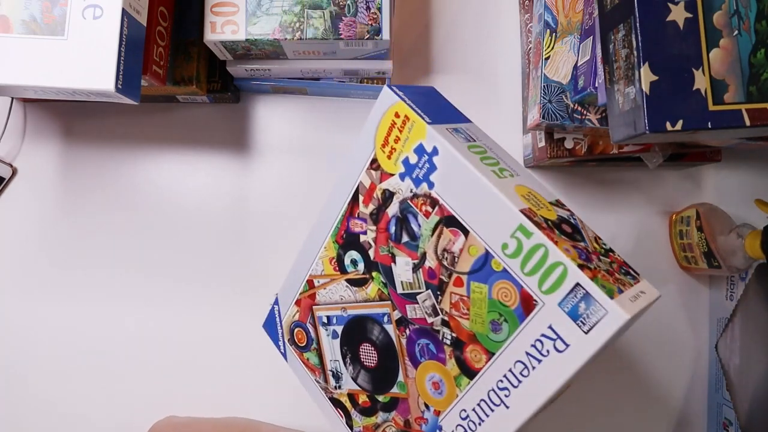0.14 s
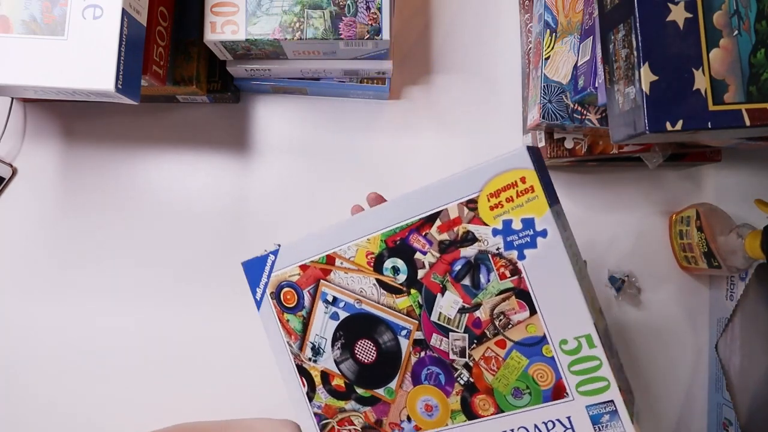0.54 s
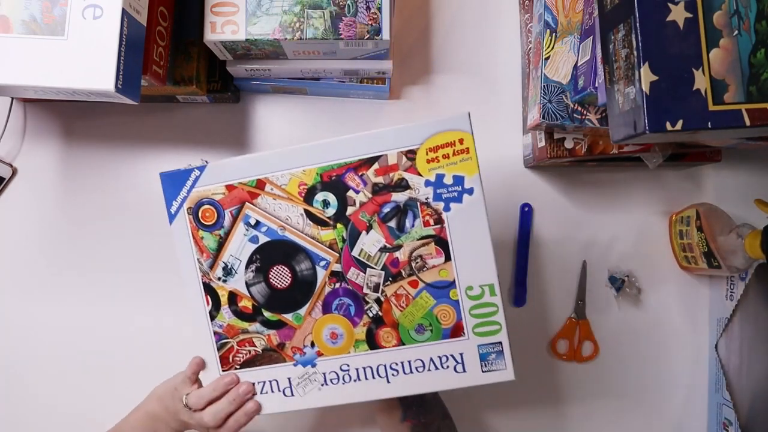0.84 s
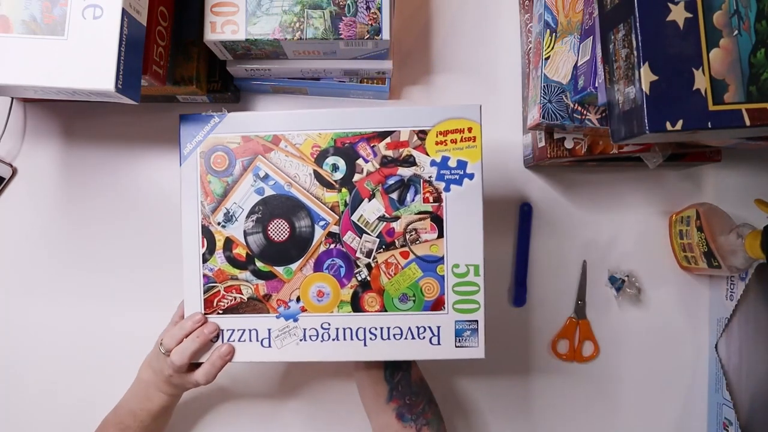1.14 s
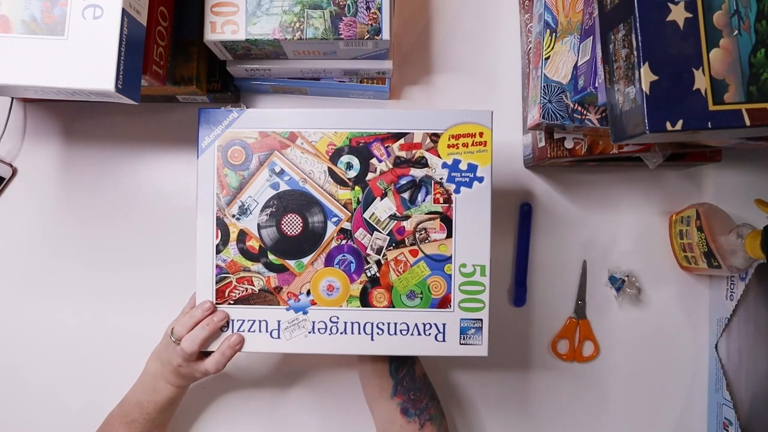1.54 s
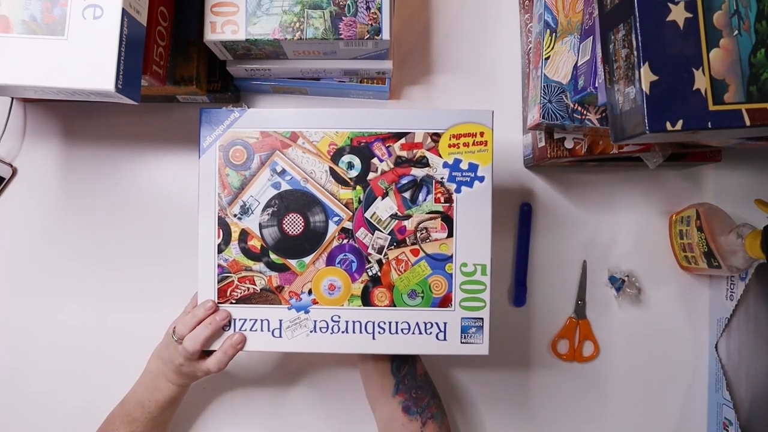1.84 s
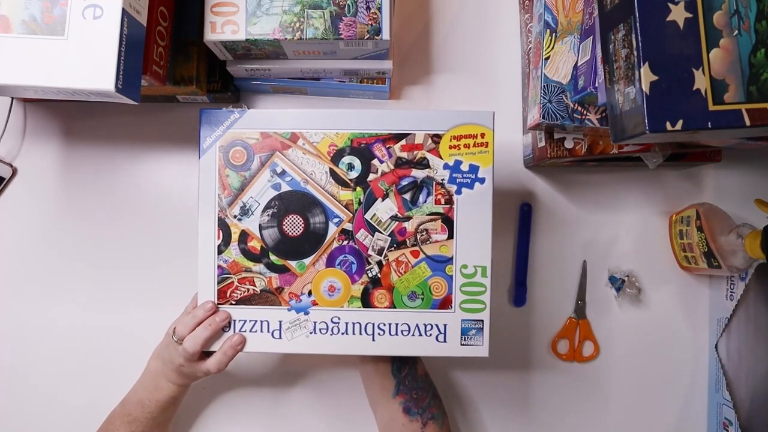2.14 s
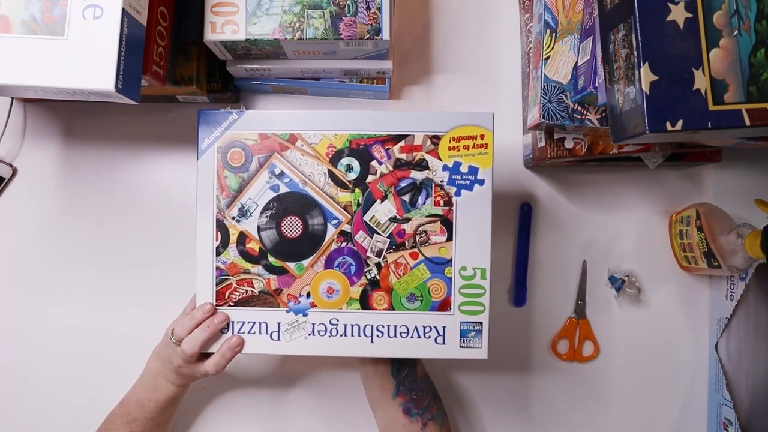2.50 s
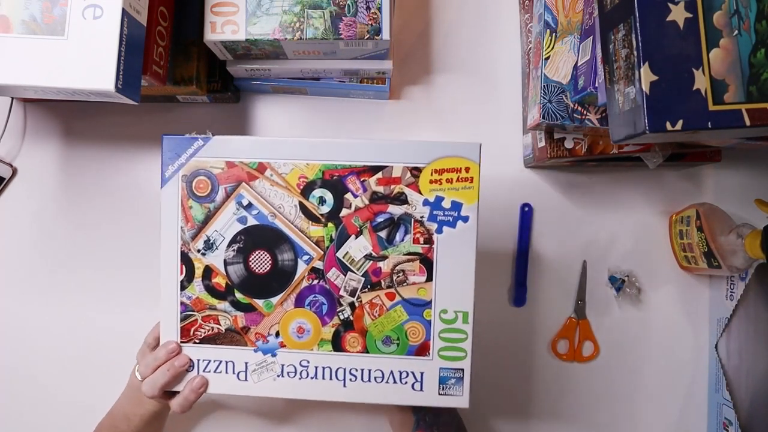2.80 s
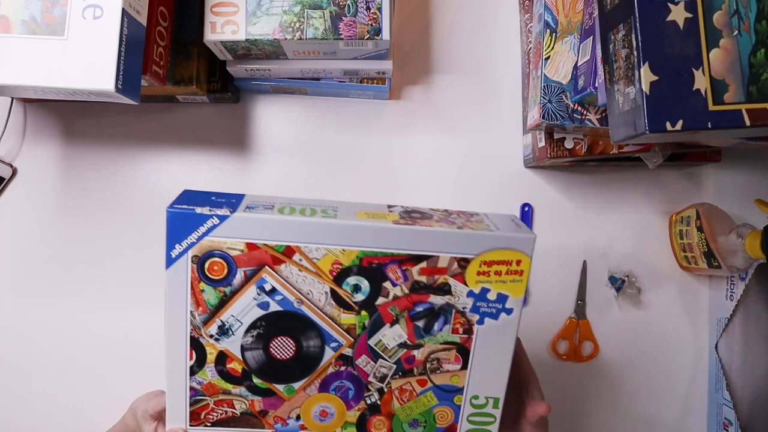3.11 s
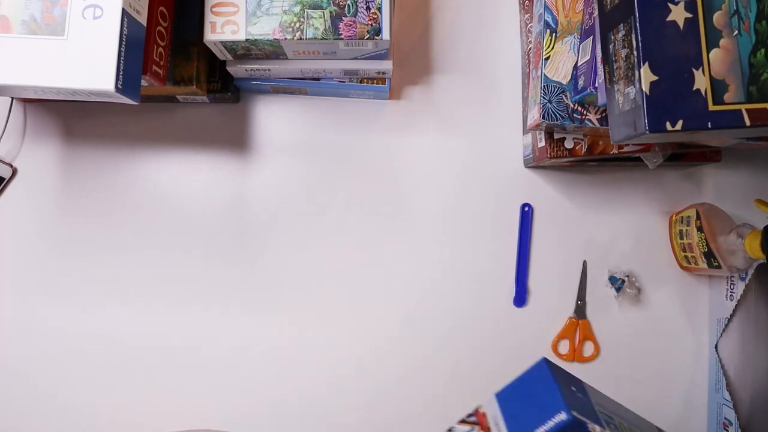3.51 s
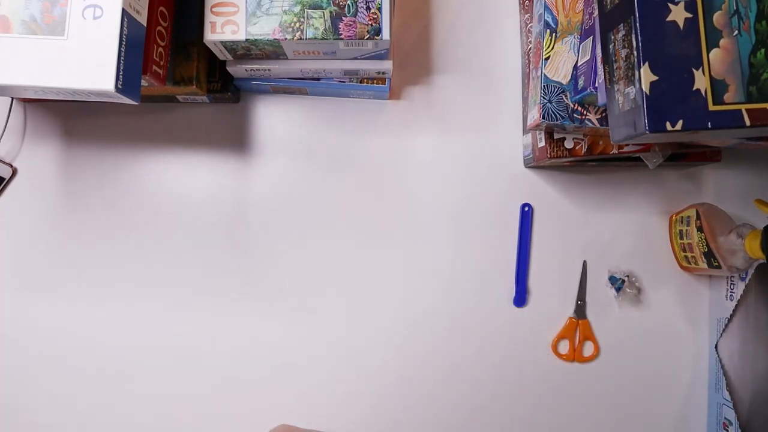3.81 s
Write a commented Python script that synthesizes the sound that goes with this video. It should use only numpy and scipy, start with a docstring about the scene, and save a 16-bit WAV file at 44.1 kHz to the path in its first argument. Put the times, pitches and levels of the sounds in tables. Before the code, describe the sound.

A cardboard box of puzzle pieces is turned by hand: hollow knocks and rattling, a still hold, soft finger rubbing, then a hard final tumble, heard close up in a small room with faint hum.

```python
"""Loose pieces knock and tumble in a cardboard puzzle box, tilted and turned over a table in a quiet room.
Each knock is a noise blow ringing the box modes, the air inside and one panel, with a crack on top;
the tumble is a random rain of small blows on the same modes, with ticks of noise.
Fingers slide over the glossy lid as shaped noise, and the room answers with a dense, gently shifting tail.
A faint appliance hum, two fuzzy tones, lies under the room noise."""
import sys
import numpy as np
from scipy import signal
from scipy.fft import rfft, irfft
from scipy.io import wavfile
from scipy.ndimage import uniform_filter1d

SR = 44100
rng = np.random.default_rng(int(sys.argv[2]) if len(sys.argv) > 2 else 0)


def transcribe(signal):
    """Save signal, clipped to [-1, 1], as a 16-bit WAV file at the path in sys.argv[1]."""
    frames = np.atleast_2d(signal).T
    limited = np.clip(frames, -1, 1)
    pcm = np.round(limited * 32767).astype(np.int16)
    wavfile.write(sys.argv[1], SR, pcm)


N = 174195

# Ringing modes of the box. Each row: frequency in Hz, width in Hz, relative level in dB.
BOX_MODES = [(174, 58, -3), (220.3, 41, 4), (317, 24, -4), (415.6, 70, 6), (550, 43, -2.5), (625, 63, 5.5),
             (716, 140, 6.5), (802, 33, -3.5), (930, 55, -7), (1220, 150, -8), (1520, 130, -15),
             (2160, 300, -39), (2600, 280, -31), (3200, 360, -15)]
# Spectrum of cracking card. Each row: frequency in Hz, relative spectrum level in dB.
CRACK_COLOUR = [(590, -16), (1000, 3.5), (1740, 3), (2560, -5.5), (3050, -6.5), (6280, -20), (10800, -33.5),
                (15600, -72)]
# Stereo image of box and fingers. Each row: frequency in Hz, left-right likeness from -1 to 1.
BOX_LIKENESS = [(60, 0.96), (120, 1), (240, 0.95), (480, 0.99), (950, 0.58), (1890, -0.051), (3770, -0.16),
                (7520, -0.51), (15000, -0.41)]

SOFT_HZ = 2840  # card on card is soft: the blow has little treble
LOW_CUT_HZ, EDGE_HZ = 110, 15600  # low cut of the box, top edge of the whole sound

# Tumbling pieces
PIECES_PER_S, PIECE_SPREAD_DB = 900, 4
CLUMP_DB, CLUMP_S = 2.5, .012  # pieces slip in small avalanches
DRIFT_DB, DRIFT_S = 4, .06  # pieces wander over the card, so each mode swells and fades
PIECE_TICK_S, PIECE_TICK_DB = .0025, -7.5  # tick decay, level beside the body at middle brightness
BRIGHT_DB = 12.5  # tilt per octave for a full step of brightness

# Knocks
SNAP, SNAP_S = .7, .0002  # first touch, against the noisy contact after it
SPLIT_HZ = 500  # air modes below, upper box modes above
SPOT_DB = 3  # spread of mode levels with the spot struck
AIR_DB, BODY_DB = -5, -13.5  # air beside the thump, upper modes below the knock level
THUMP_WIDTH_HZ, PANEL_WIDTH_HZ = 110, 170
OVERTONE, OVERTONE_DB = 1.696, -9.5  # second mode of the struck panel
CRACK_S = .012

# Room
FADE_HALF_CYCLES_PER_S = 1.7  # how quickly the three reverberation tails take turns
ECHO_DB, ECHO_WAIT_S = -4.5, .003


def amp(db):
    """Decibels to linear gain."""
    return 10 ** (np.asarray(db) / 20)


def evened(x):
    """Scales to an rms of one."""
    return x / np.sqrt(np.mean(x ** 2) + 1e-20)


def read(points, hz):
    """Reads a frequency table between its points, on a log frequency axis."""
    f, value = np.transpose(points)
    return np.interp(np.log(hz + 1), np.log(f + 1), value)


def curve(table, column):
    """Draws one column of a time table as a line over the whole scene."""
    rows = np.transpose(table)
    return np.interp(np.arange(N) / SR, rows[0], rows[column])


def smoothed(x, seconds):
    """Two moving averages along time."""
    size = int(seconds * SR)
    return uniform_filter1d(uniform_filter1d(x, size), size)


def coloured(x, points):
    """Filters by a spectrum in dB."""
    size = x.shape[-1]
    return irfft(rfft(x) * amp(read(points, np.fft.rfftfreq(size, 1 / SR))), size)


def ring(x, hz, width):
    """One damped mode struck by x; a wider mode dies sooner."""
    r = np.exp(-np.pi * abs(width) / SR)
    return signal.lfilter([.5, 0, -.5], [1, -2 * r * np.cos(2 * np.pi * hz / SR), r * r], x)


def double_ring(x, hz, width):
    """A mode with a rounded onset: a broad resonance feeds a narrow one."""
    return ring(ring(x, hz, 3 * width), hz, width)


def soften(x):
    """Soft card dulls the treble of a blow."""
    return signal.sosfilt(signal.butter(2, SOFT_HZ, fs=SR, output="sos"), x)


def two_ports(a, b):
    """Left is a; right blends a with b, alike in the bass and partly opposite in the treble."""
    size = len(a)
    same = np.clip(read(BOX_LIKENESS, np.fft.rfftfreq(size, 1 / SR)), -1, 1)
    right = same * rfft(a) + np.sqrt(1 - same ** 2) * rfft(b)
    return np.array([a, irfft(right, size)])


def pair_noise(colour, likeness, patchy_db):
    """Stereo noise, partly alike left and right, with drifting patches in time and frequency."""
    frames, hz = N // 128 + 5, np.fft.rfftfreq(1024, 1 / SR)
    a, b, c, d, patch = rng.standard_normal((frames // 2, 513, 5)).T
    patch = uniform_filter1d(patch, size=12, axis=0)
    patch = evened(uniform_filter1d(patch, size=10, axis=1))
    same = np.clip(read(likeness, hz), -1, 1)[:, None]
    left = a + 1j * b
    right = same * left + np.sqrt(1 - same ** 2) * (c + 1j * d)
    z = np.array([left, right]) * amp(read(colour, hz)[:, None] + patchy_db * patch)
    return evened(signal.istft(z, nperseg=1024, noverlap=768)[1][:, :N])


def background():
    """Room noise and two appliance hum tones, each a sine made fuzzy by narrow noise around it."""
    # Room noise spectrum. Each row: frequency in Hz, relative spectrum level in dB.
    noise_colour = [(20, -30), (40, -16), (70, -1), (120, 2.5), (200, 0), (330, -3), (600, -3.5),
                    (1000, -11), (2000, -14), (4000, -21), (8000, -29), (13000, -92), (15600, -70)]
    # Room noise image. Each row: frequency in Hz, left-right likeness from -1 to 1.
    noise_likeness = [(60, 1), (130, 0.82), (290, 0.13), (640, -0.03), (1410, -0.79), (3100, -0.77),
                      (6820, -0.61), (15000, -0.55)]
    # Hum tones. Each row: frequency in Hz, width of the fuzz in Hz, level in dB.
    hum_tones = [(90, 3.8, -52.5), (238.5, 9.3, -54.5)]
    hum = 0
    for hz, width, db in hum_tones:
        tone = np.sin(2 * np.pi * hz * np.arange(N) / SR)
        fuzz = evened(ring(rng.standard_normal(N), hz, width))
        hum = hum + amp(db) * evened(tone + 0.34 * fuzz)
    return amp(-44.5) * pair_noise(noise_colour, noise_likeness, patchy_db=0.5) + hum


def echoes(x, decay, wait_s):
    """Dense reflections, each band dying at its own speed, partly alike left and right."""
    hz, t, z = signal.stft(rng.standard_normal((2, SR // 2)), SR, nperseg=128)
    tail = signal.istft(z * amp(-60 * t / read(decay, hz)[:, None]), SR, nperseg=128)[1]
    tail = two_ports(*np.pad(tail, ((0, 0), (int(wait_s * SR), 0))))
    return signal.fftconvolve(x[None], tail / np.linalg.norm(tail[0]), axes=1)[:, :N]


def shifting_room(x):
    """Three sets of reflections fade in and out in turn, at steady total power."""
    # Room decay. Each row: frequency in Hz, time to fall 60 dB in seconds.
    decay = [(200, 0.55), (600, 0.41), (1500, 0.31), (4000, 0.43), (10000, 0.13)]
    phase = np.pi * FADE_HALF_CYCLES_PER_S * np.arange(N) / SR
    room = 0
    for k in range(3):
        fade = np.sqrt(2 / 3) * np.cos(phase + k * np.pi / 3)
        room = room + echoes(x * fade, decay, ECHO_WAIT_S)
    return amp(ECHO_DB) * room


def slide():
    """Skin dragging on glossy card: a fine, slightly patchy hiss."""
    # Loudness of the sliding as a line. Each row: time in seconds, level in dB.
    slide_level = [(0, -71), (.05, -39.5), (.2, -54), (.33, -53), (.5, -47.5), (.62, -41.5), (.95, -45.5),
                   (1.02, -49.5), (1.2, -61.5), (1.9, -62), (2.62, -63.5), (2.72, -51), (2.92, -47),
                   (2.98, -39), (3.14, -37.5), (3.22, -46.5), (3.3, -49.5), (3.4, -51), (3.55, -41),
                   (3.8, -43.5), (3.95, -41)]
    # Hiss spectrum. Each row: frequency in Hz, relative spectrum level in dB.
    slide_colour = [(500, -41), (1200, -7.5), (2500, -9.5), (5000, -10), (8000, -12), (11300, -10.5),
                    (13500, -21), (15600, -41)]
    return amp(curve(slide_level, 1)) * pair_noise(slide_colour, BOX_LIKENESS, patchy_db=0.9)


def tumble():
    """Many small pieces land at random; each side hears a piece through other modes of the box."""
    # Flow of the pieces. Each row: time in seconds, level in dB, brightness from 0 to 1.
    flow = [(0.0, -34, 0.59), (0.22, -45, 0.65), (0.44, -42, 0.46), (0.58, -39.5, 0.52), (0.64, -37.5, 0.4),
            (0.68, -35, 0.78), (0.73, -36, 0.58), (0.78, -29.5, 0.54), (0.84, -32.5, 0.68),
            (0.875, -38, 0.44), (0.9, -29.5, 0.65), (0.96, -38, 0.66), (1.1, -40.5, 0.59),
            (1.22, -41, 0.54), (1.4, -48.5, 0.3), (1.53, -40, 0.24), (1.64, -49, 0.5), (1.88, -53, 0.64),
            (2.14, -61.5, 0.68), (2.69, -56, 0.68), (2.91, -50.5, 0.6), (3.12, -45.5, 0.07),
            (3.28, -39, 0.34), (3.37, -34.5, 0.41), (3.435, -27, 0.59), (3.49, -25, 0.66),
            (3.55, -21.5, 0.68), (3.62, -23, 0.79), (3.66, -22, 0.75), (3.73, -19, 0.61),
            (3.79, -28.5, 0.68), (3.85, -25.5, 0.8), (3.9, -42, 0.68), (3.95, -39.5, 0.76)]
    bright = curve(flow, 2) - .5
    landing = rng.random(N) < PIECES_PER_S / SR
    hits = landing * amp(PIECE_SPREAD_DB * np.minimum(rng.exponential(1, N), 3))
    clump = evened(smoothed(rng.standard_normal(N), CLUMP_S))
    hits = hits * rng.choice([-1., 1.], N) * amp(CLUMP_DB * clump)

    spots = rng.random((N, 2, len(BOX_MODES))).T < .3  # a piece reaches about a third of the modes
    drifts = smoothed(rng.standard_normal((N, len(BOX_MODES))).T, DRIFT_S)
    body = 0
    for (hz, width, db), spot, drift in zip(BOX_MODES, spots, drifts):
        tilt = BRIGHT_DB * bright * np.log2(hz / 600)
        body = body + amp(db + DRIFT_DB * evened(drift) + tilt) * ring(hits * spot, hz, width)
    body = evened(soften(body))

    tick_decay = np.exp(-np.arange(600) / SR / PIECE_TICK_S)
    tick = coloured(rng.standard_normal((2, N)), CRACK_COLOUR)
    tick = evened(tick * signal.oaconvolve(abs(hits), tick_decay)[:N])
    tick = amp(PIECE_TICK_DB + 2.7 * BRIGHT_DB * bright) * tick
    return two_ports(*(amp(curve(flow, 1)) * (body + tick)))


def knock(row, t):
    """A noisy blow rings the box modes by where it lands, the air inside and the nearest panel."""
    _, db, thump_db, thump_hz, crack_db, panel_db, panel_hz, contact_s, pan_db = row
    blow, crack = rng.standard_normal((2, 2, len(t)))
    spot = rng.standard_normal(len(BOX_MODES))
    contact = np.minimum(t / (0.096 * contact_s), 1) * np.exp(-t / contact_s)
    blow = blow * contact + SNAP * np.exp(-t / SNAP_S)

    soft_blow = soften(blow)
    air, body = 0, 0
    for (hz, width, mode_db), k in zip(BOX_MODES, spot):
        mode = amp(mode_db + SPOT_DB * k) * ring(soft_blow, hz, width)
        if hz < SPLIT_HZ:
            air = air + mode
        else:
            body = body + mode
    thump = double_ring(blow, thump_hz, THUMP_WIDTH_HZ)
    panel = double_ring(blow, panel_hz, PANEL_WIDTH_HZ)
    overtone = double_ring(blow, OVERTONE * panel_hz, OVERTONE * PANEL_WIDTH_HZ)
    panel = panel + amp(OVERTONE_DB) * overtone
    crack = coloured(crack, CRACK_COLOUR) * contact * np.exp(-t / CRACK_S)
    crack = np.diff(crack, prepend=0)  # tilts the crack toward the treble

    # Even each part over its first 600 samples, so the levels set the balance of the attack
    thump, air, body, panel, crack = (part / np.sqrt(np.mean(part[:, :600] ** 2, 1, keepdims=True))
                                      for part in (thump, air, body, panel, crack))
    sound = amp(thump_db) * (thump + amp(AIR_DB) * air) + amp(db + BODY_DB) * body
    sound = sound + amp(panel_db) * panel + amp(crack_db) * crack
    # Silence ahead takes the backward spread of the stereo filter, then is cut away
    stereo = two_ports(*np.pad(sound, ((0, 0), (512, 0))))[:, 512:]
    return stereo * amp([[pan_db / 2], [-pan_db / 2]])


def knocks():
    """Single blows on the hollow box, each ringing out over those before it."""
    # Knocks on the box. Each row: start in seconds, knock level in dB (upper modes sit BODY_DB from it),
    # thump level in dB, thump frequency in Hz, crack level in dB, struck panel level in dB,
    # panel frequency in Hz, contact decay in seconds, left over right in dB.
    knock_rows = [(0.005, -17.5, -48, 235, -32.5, -31, 1330, 0.0049, 0),
                  (0.047, -21, -61, 360, -28.5, -36, 1130, 0.01, -8.5),
                  (0.124, -20.5, -45.5, 168, -41, -36, 1500, 0.006, 2.5),
                  (0.292, -19.5, -54, 393, -35, -31, 2510, 0.0059, -5.5),
                  (0.301, -52, -68, 390, -62, -46, 2550, 0.035, -11),
                  (0.488, -32, -50, 255, -72, -43, 1610, 0.0055, 4),
                  (0.558, -21.5, -41, 179, -37, -35.5, 1790, 0.0058, 3),
                  (0.649, -11.5, -35, 224, -35, -51, 1350, 0.0065, 1.5),
                  (0.666, -13, -29.5, 219, -34.5, -40, 1704, 0.0026, -1),
                  (0.690, -29, -34.5, 410, -48, -38, 690, 0.004, -2),
                  (0.742, -14.5, -34, 406, -55, -33, 820, 0.0057, 1.5),
                  (0.764, -14, -31, 210, -34, -37, 2620, 0.0083, 0),
                  (0.801, -21, -30.5, 404, -48, -27, 1037, 0.0026, -0.5),
                  (0.813, -18.5, -29.5, 201, -43, -33, 2100, 0.0035, -1),
                  (0.881, -15.5, -37, 420, -36.5, -40, 2900, 0.0069, -1.5),
                  (0.912, -27, -43, 304, -42, -32, 2260, 0.0069, -6),
                  (0.917, -9.5, -25.5, 198, -33, -25.5, 1010, 0.0041, 0),
                  (1.167, -16.5, -37, 310, -37.5, -36.5, 2460, 0.0062, -1.5),
                  (1.176, -22, -48, 310, -39, -44, 2500, 0.0033, 2),
                  (1.241, -21, -36, 387, -63, -39, 1470, 0.001, 0.5),
                  (1.248, -27, -34, 390, -62, -39, 1290, 0.0046, -3.5),
                  (1.286, -41, -49, 396, -64, -40.5, 1430, 0.002, -2),
                  (1.415, -37, -40.5, 430, -80, -39, 770, 0.0067, 7),
                  (1.429, -8.5, -39, 417, -34.5, -31, 1010, 0.0037, -3),
                  (1.455, -19, -33.5, 435, -54, -62, 1750, 0.0042, 2),
                  (1.493, -14, -32, 416, -40, -46, 1320, 0.015, -1),
                  (1.521, -26.5, -33, 426, -56, -42, 1560, 0.01, 1),
                  (1.571, -41, -36.5, 406, -53, -62, 1650, 0.0053, -4.5),
                  (1.665, -18, -26, 364, -55, -27.5, 1570, 0.009, 0),
                  (1.694, -14.5, -34.5, 445, -79, -37, 1740, 0.0078, -4),
                  (1.741, -38, -39.5, 316, -75, -36, 1540, 0.01, 3),
                  (1.751, -15, -26.5, 440, -35.5, -29.5, 1540, 0.0076, -1),
                  (1.984, -43, -54.5, 318, -72, -48.5, 1640, 0.0032, 10),
                  (2.106, -50, -56, 250, -56.5, -81, 1590, 0.003, 15.5),
                  (2.671, -41, -58, 224, -62, -75, 1750, 0.0047, -16),
                  (2.702, -40, -51, 238, -47.5, -55, 2450, 0.012, -6),
                  (2.747, -49, -43, 268, -50, -53, 1490, 0.025, 0),
                  (2.801, -60, -41, 203, -46, -63, 1400, 0.011, 1.5),
                  (2.83, -34.5, -40.5, 420, -45, -55, 1320, 0.0039, -0.5),
                  (3.209, -22, -45, 197, -34, -38, 790, 0.0053, -3),
                  (3.313, -23.5, -40, 228, -37.5, -57, 1660, 0.018, -2),
                  (3.35, -42, -64, 300, -49, -48, 606, 0.0091, -2),
                  (3.383, -25, -53, 302, -42, -41, 906, 0.0038, 0),
                  (3.445, -17, -32, 447, -42, -32.5, 1540, 0.0057, -2),
                  (3.468, -22, -39, 445, -35, -36, 1600, 0.0025, -4),
                  (3.484, -16, -29, 400, -38, -28.5, 3130, 0.0057, -1.5),
                  (3.5, -21, -18.5, 417, -20, -22.5, 1480, 0.0055, 1),
                  (3.529, -34, -17, 322, -18.5, -21, 2970, 0.011, 1),
                  (3.554, -15, -26.5, 427, -30, -23, 1510, 0.0041, -1.5),
                  (3.605, -41, -27, 423, -23, -38, 1550, 0.013, -0.5),
                  (3.634, -10, -42, 406, -32, -21.5, 1640, 0.0036, 1),
                  (3.647, -11, -33, 500, -29, -23, 1480, 0.0027, 1),
                  (3.661, -14, -31, 560, -42, -26, 2210, 0.0034, -3),
                  (3.699, -8, -28, 344, -50, -27.5, 1290, 0.0061, 4),
                  (3.717, -7.5, -31, 445, -32.5, -22.5, 1150, 0.003, 1),
                  (3.744, -11, -30, 443, -42, -35, 1290, 0.0026, 1),
                  (3.767, -8, -22, 396, -57, -27, 1290, 0.0031, 0.5),
                  (3.808, -7, -26.5, 383, -40, -38, 1000, 0.0036, 1),
                  (3.827, -12, -29.5, 380, -27.5, -33, 1350, 0.0087, -2),
                  (3.836, -11, -41, 400, -45, -40, 1110, 0.002, -5),
                  (3.841, -17, -33, 370, -34, -18, 790, 0.0047, 5.5),
                  (3.878, -14, -49, 390, -40, -31, 795, 0.003, 0)]
    size = 7680
    out, t = np.zeros((2, N + size)), np.arange(size) / SR
    for row in knock_rows:
        at = round(row[0] * SR)
        out[:, at:at + size] += knock(row, t)
    return out[:, :N]


def scene():
    """The box, its reflections, the fingers and the room noise together."""
    box = knocks() + tumble() * amp([[-.6], [.6]])  # the tumble leans right
    box = signal.sosfilt(signal.butter(2, LOW_CUT_HZ, "high", fs=SR, output="sos"), box)
    return box + shifting_room(box[0]) + slide() + background()


def record(dry):
    """Soft overload, strongest on the loudest knocks, then the band limit."""
    band_limit = signal.firwin(511, EDGE_HZ, window=("kaiser", 9), fs=SR)
    return signal.oaconvolve(np.tanh(dry), band_limit[None], "same")


dry = scene()
out = record(dry)
transcribe(out)
```